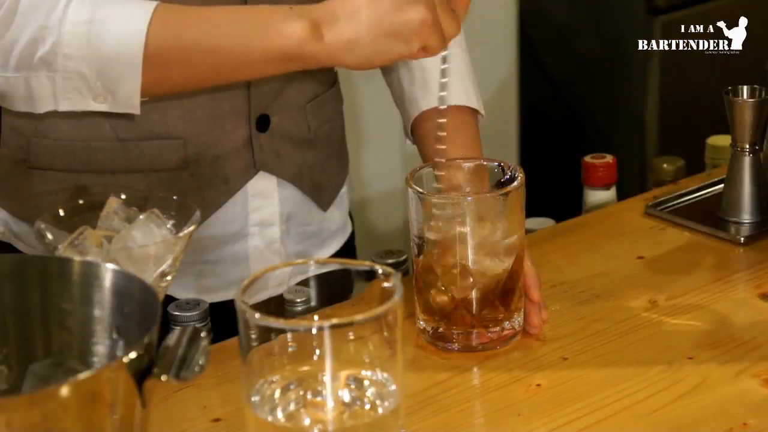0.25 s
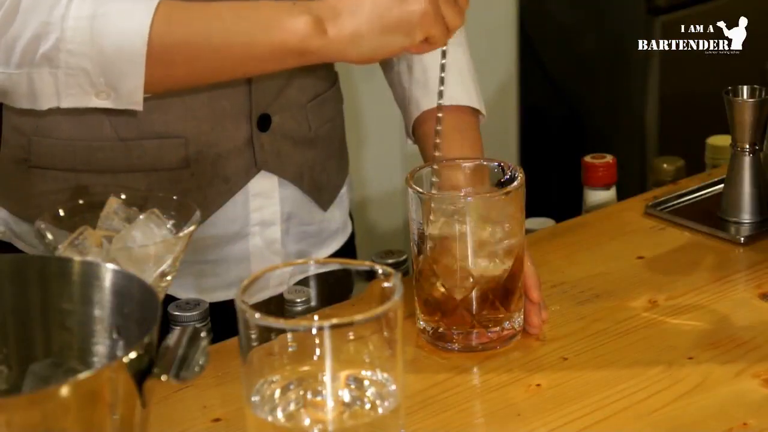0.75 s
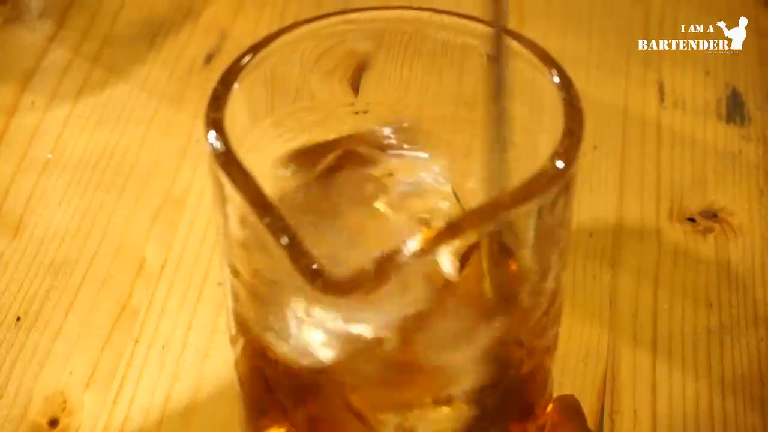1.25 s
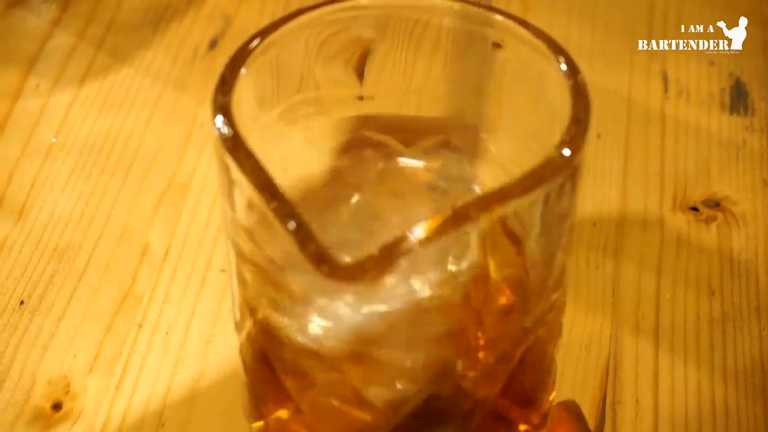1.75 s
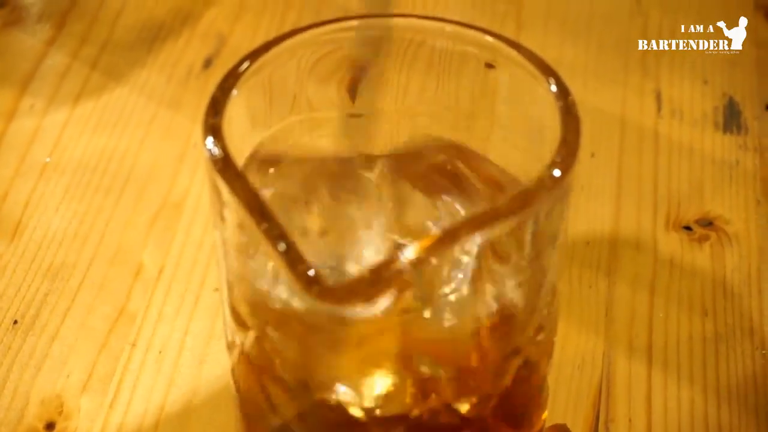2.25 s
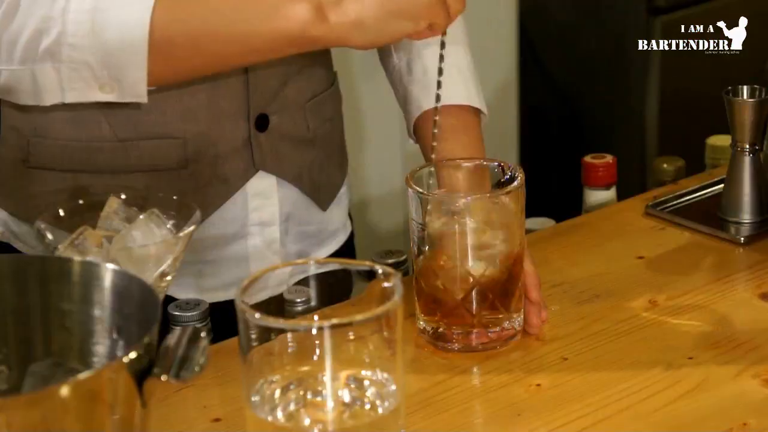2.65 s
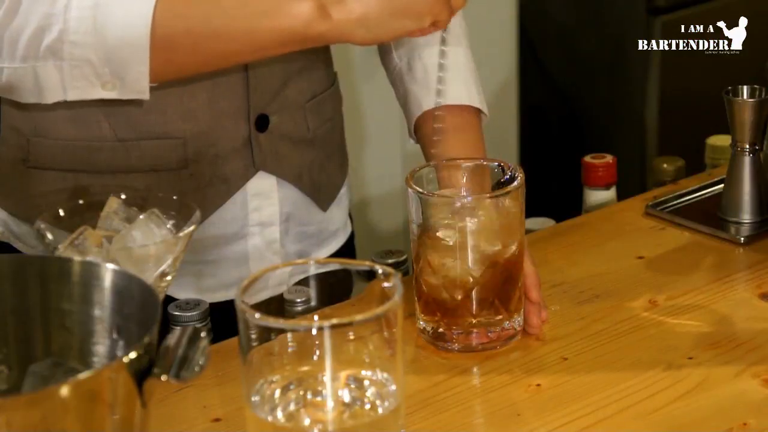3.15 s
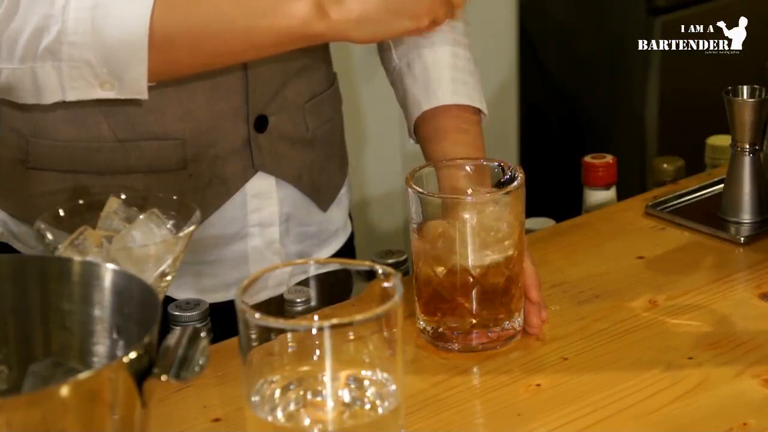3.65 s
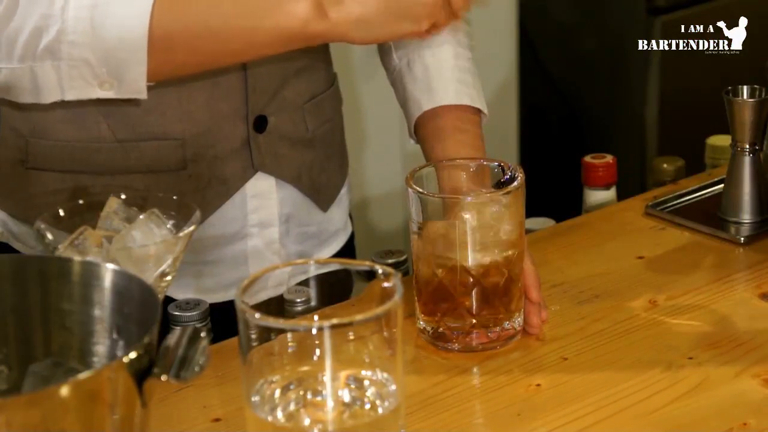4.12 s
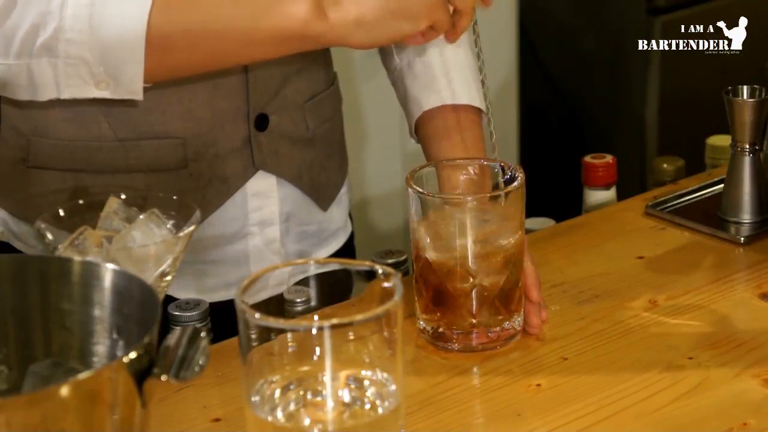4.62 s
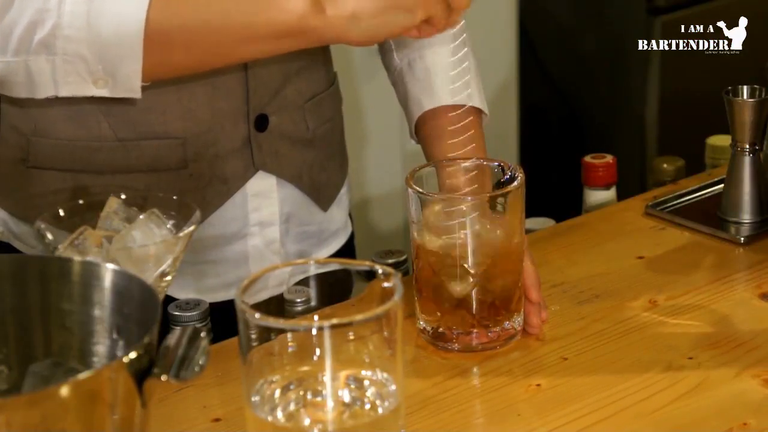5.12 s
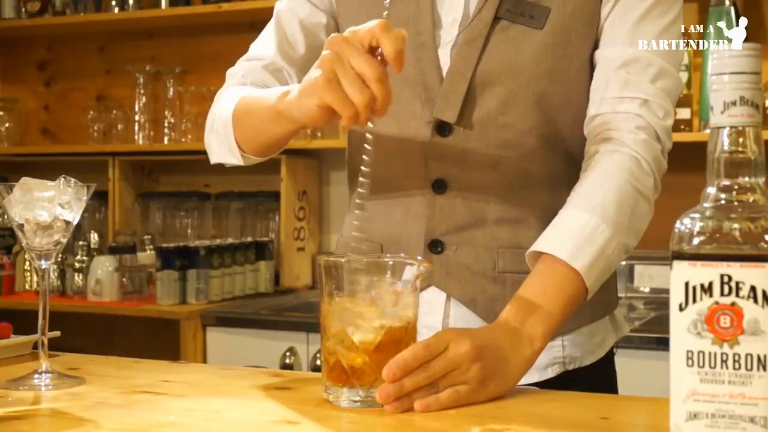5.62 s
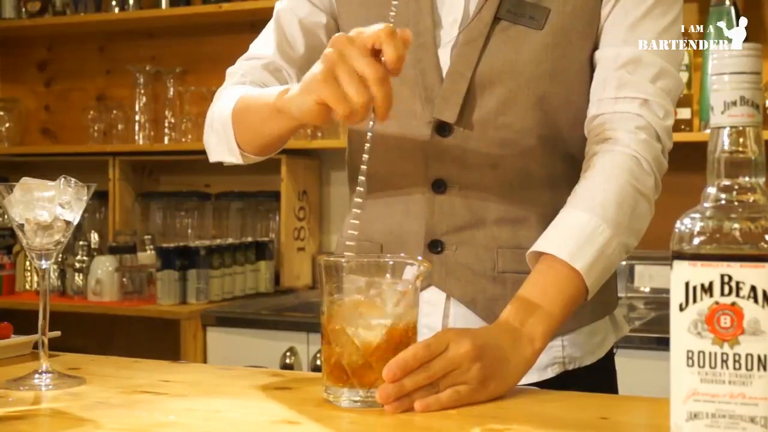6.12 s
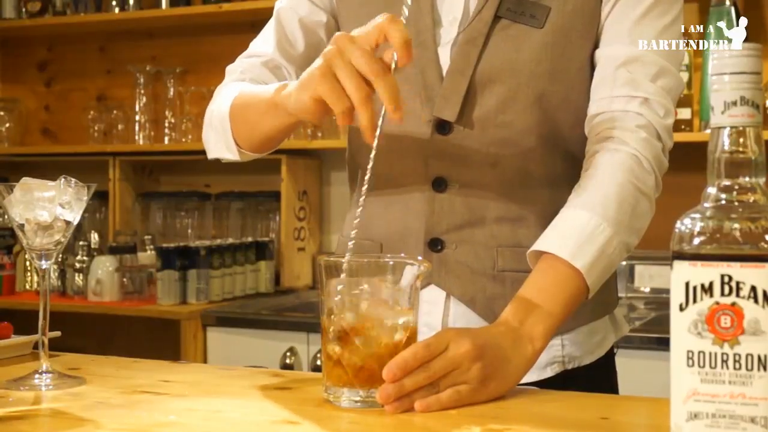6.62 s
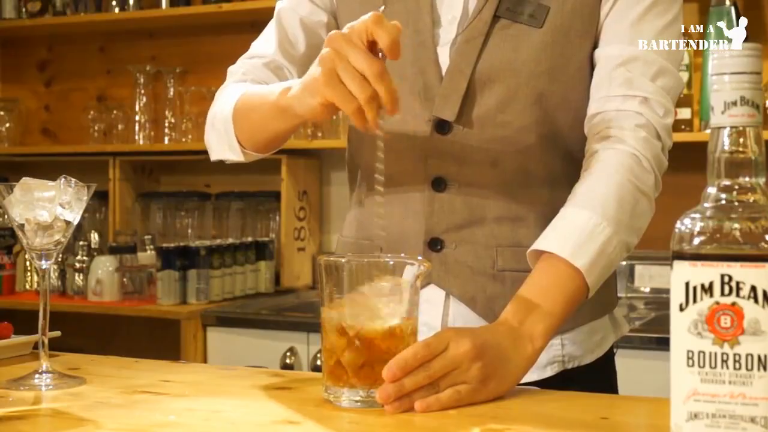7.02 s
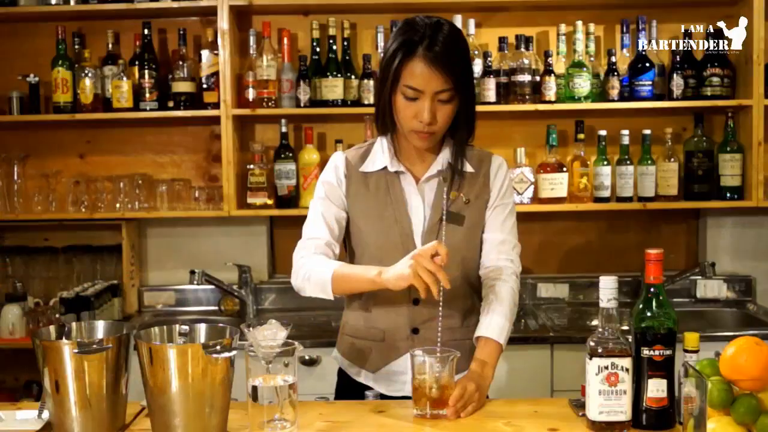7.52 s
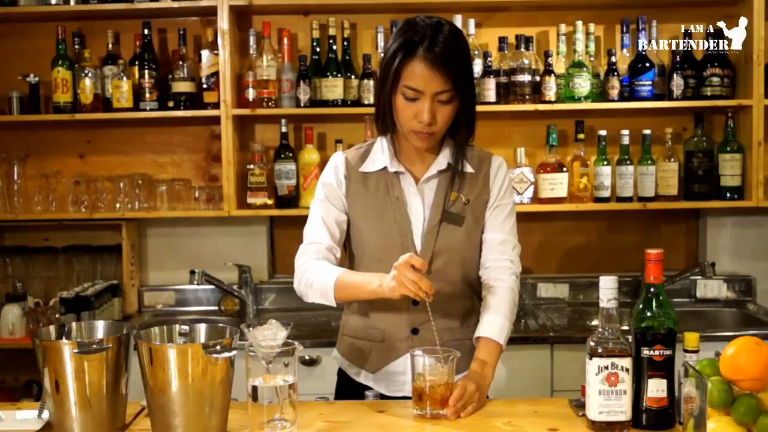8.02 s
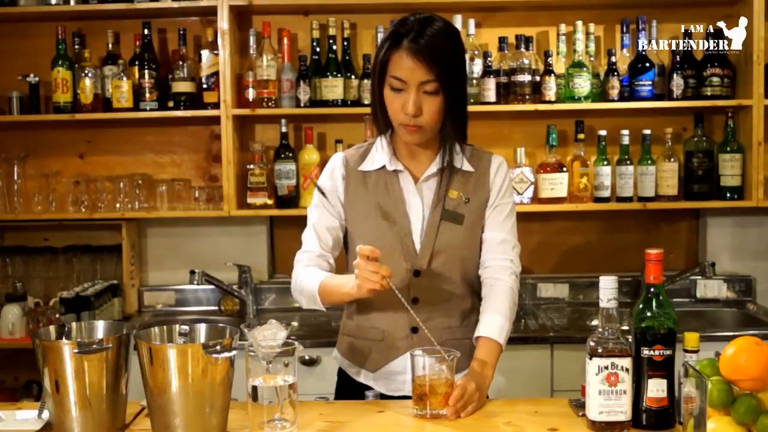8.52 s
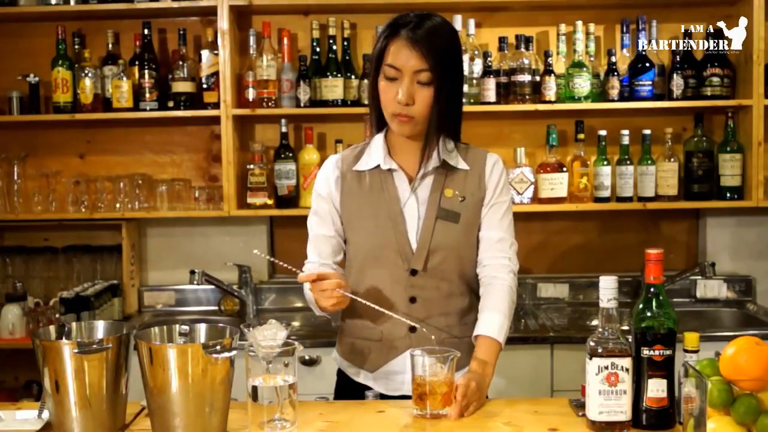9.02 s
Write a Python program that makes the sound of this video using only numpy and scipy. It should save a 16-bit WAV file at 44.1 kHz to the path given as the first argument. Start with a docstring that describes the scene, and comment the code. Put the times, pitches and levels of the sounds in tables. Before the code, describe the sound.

Wet ice is stirred rhythmically in a heavy glass, first softly, then close with sharp clinks, slowing to a final rattle and small spoon clinks.

```python
"""Stirring ice in a mixing glass

A long spoon stirs ice cubes and a drink in a thick glass, in a small bar with humming coolers, heard from
changing distances. Random contacts excite resonators: the packed ice churns and chatters along the wall, single
cubes clink and knock, and the glass rings along, flattened in pitch by the swirling drink. At the end the
ice collapses in a rattle and the spoon clinks on its way out."""
import sys
import numpy as np
from scipy import signal
from scipy.fft import rfft, irfft, next_fast_len
from scipy.io import wavfile
from scipy.ndimage import uniform_filter1d

SR = 44100
rng = np.random.default_rng(int(sys.argv[2]) if len(sys.argv) > 2 else 0)


def digitize_waveform(pressure):
    """Quantize a signal to 16-bit integers and store it at the path in sys.argv[1].

    Rows of a 2-D input are taken as channels; values are limited to [-1, 1].
    """
    field = np.atleast_2d(pressure).T
    bounded = np.clip(field, -1, 1)
    quanta = np.round(bounded * 32767).astype(np.int16)
    wavfile.write(sys.argv[1], SR, quanta)


N = 408530
TIME = np.arange(N) / SR  # s

# Levels in the tables are relative within their layer unless stated.
# hard contacts of cubes and spoon: start_s, body_db, crack_hz, crack_db, glass_ring_db
HARD_CONTACTS = [(1.243, -17, 2750, -20, -45), (1.453, -10.5, 2850, -19, -31), (1.469, -18, 3140, -37, -45),
                 (1.531, -15.5, 4800, -18.5, -24), (1.549, -19, 4300, -28, -39),
                 (1.577, -16, 3700, -21, -47), (1.694, -26, 3200, -31, -48), (1.73, -24, 3120, -20, -39),
                 (1.738, -13.5, 4670, -14.5, -23), (1.745, -10.5, 4530, -10, -30),
                 (1.805, -9, 6440, -17.5, -34), (1.823, -12.5, 3300, -15.5, -42),
                 (1.839, -20, 2900, -26, -42), (1.935, -20, 3370, -31, -29), (1.959, -16, 4240, -35, -39),
                 (1.999, -11.5, 3100, -20, -37), (2.165, -17.5, 6460, -36, -31),
                 (2.2, -16, 3900, -18.5, -40), (2.211, -19, 6460, -23.5, -45),
                 (2.391, -18.5, 2900, -23, -39), (2.436, -10, 6450, -29, -40),
                 (2.47, -16.5, 2960, -19.5, -39), (2.527, -16.5, 4800, -25, -33),
                 (2.587, -21, 5010, -35, -39), (2.859, -28, 2860, -32.5, -40), (3.583, -34, 2600, -31, -31),
                 (4.698, -26, 2560, -30, -28), (5.142, -25, 2520, -28, -32), (6.127, -32, 3630, -32.5, -46),
                 (6.389, -33, 2550, -27, -30), (6.666, -25, 2400, -24.5, -24.5),
                 (7.093, -33, 2720, -19, -18.5), (7.338, -19, 5100, -24.5, -25),
                 (7.506, -23.5, 4000, -30, -30), (7.664, -21, 3460, -21, -45),
                 (7.988, -19, 6680, -19.5, -23), (8.017, -23, 6650, -22, -38),
                 (8.033, -8.5, 4970, -21, -39), (8.34, -25.5, 3900, -35, -46), (8.511, -45, 1280, -26, -42),
                 (8.61, -45, 2700, -40, -30.5), (8.924, -37, 4650, -34.5, -42),
                 (9.017, -38, 3020, -26, -25.5), (9.039, -28, 3540, -29, -28)]
# modes of the filled glass, with the drink at rest for pitch and in full swirl for decay: mode_hz, level_db, t60_s
GLASS_MODES = [(2550, 0, 0.038), (2678, 5.5, 0.048), (2709, -1, 0.15), (2752, 3, 0.062), (3030, -29, .07),
               (3520, -11.5, 0.07), (4780, -18.5, 0.066), (5600, -18, 0.042), (6574, -6.5, 0.048)]
# ice scrapes along the glass wall: start_s, length_s, level_db
WALL_SCRAPES = [(0, 0.05, -39), (0.184, 0.035, -37), (0.933, 0.074, -36.5), (1.192, 0.072, -29.5),
                (1.385, 0.032, -33.5), (1.897, 0.13, -31), (2.081, 0.11, -32.5), (2.193, 0.085, -27.5),
                (2.863, 0.091, -36.5), (3.072, 0.095, -33.5), (3.312, 0.013, -28), (3.548, 0.033, -35),
                (3.781, 0.068, -32), (4.01, 0.024, -30), (4.23, 0.044, -30), (4.48, 0.019, -31),
                (4.691, 0.12, -32.5), (4.835, 0.027, -27.5), (4.956, 0.026, -36), (5.136, 0.024, -30.5),
                (5.233, 0.027, -29.5), (5.353, 0.023, -29), (5.556, 0.083, -33.5), (5.827, 0.037, -33.5),
                (6.105, 0.03, -31.5), (6.315, 0.016, -31.5), (6.55, 0.16, -34.5), (6.786, 0.081, -31),
                (6.966, 0.11, -35), (7.098, 0.065, -31.5), (7.238, 0.0085, -34.5), (7.326, 0.12, -32.5),
                (7.659, 0.074, -27.5), (7.896, 0.12, -28.5), (8.372, 0.081, -36.5), (8.614, 0.031, -38)]
# shoves of the spoon against cubes under the surface: start_s, level_db
SPOON_SHOVES = [(0.318, -31), (0.404, -34), (1.013, -26), (2.957, -26), (3.2, -28), (3.425, -25),
                (3.651, -20), (3.882, -21), (4.114, -26), (4.345, -25.5), (4.574, -29), (4.818, -22),
                (5.026, -25), (5.25, -32), (5.486, -22), (5.952, -29), (6.232, -24), (7.46, -26),
                (7.509, -22.5), (7.681, -33), (7.951, -26), (8.389, -27.5)]
# spectrum of the body of a struck cube: frequency_hz, level_db
BODY_SPECTRUM = [(1100, -21.5), (2100, -19), (2600, 0.5), (2950, -4), (3500, -13.5), (4100, -14)]
# spectrum of the edge of a struck cube: frequency_hz, level_db
EDGE_SPECTRUM = [(3300, 6.5), (4650, 3), (5900, -5), (6500, 0), (7500, -5), (8300, -47)]
# spectrum of a small chip of ice: frequency_hz, level_db
CHIP_SPECTRUM = [(3500, 3), (6500, 4.5), (8200, -4), (9800, 3.5), (15500, -17)]

SHOVE_ATTACK_S = 0.006
# shares of the wall's pitch at full swirl: steady lowering, and spread of the random wobble
SWIRL_FLATTENS, SWIRL_WOBBLES = 0.043, 0.011


def from_db(db):
    """Level to amplitude: 20 dB is a factor of ten."""
    return 10 ** (np.asarray(db) / 20)


def together_db(*gains):
    """Incoherent addition: the powers of unrelated sounds add."""
    return 10 * np.log10(sum(gain ** 2 for gain in gains) + 1e-18)


def rms_one(x):
    """Normalization to unit root-mean-square amplitude."""
    return x / np.sqrt(np.mean(x ** 2) + 1e-20)


def in_time(rows):
    """Linear interpolation: one curve per column, joined by straight lines."""
    s, *columns = np.transpose(rows)
    return [np.interp(TIME, s, c) for c in columns]


def held(rows):
    """Sample and hold: each value lasts until the next row, with short smoothed steps."""
    s, *columns = np.transpose(rows)
    row = np.searchsorted(s[1:], TIME)
    return [uniform_filter1d(c[row], size=800) for c in columns]


def at_hz(points, hz):
    """Interpolation of a spectrum on a logarithmic frequency axis."""
    known_hz, values = np.transpose(points)
    return np.interp(np.log(np.maximum(hz, 1)), np.log(known_hz), values)


def drift(rate):
    """Random modulation of unit rms: straight lines between random values, rate of them a second."""
    steps = rng.standard_normal(4096)
    return rms_one(np.interp(TIME * rate, np.arange(len(steps)), steps))


def cut(x, hz, kind, order=2):
    """Band limitation by a Butterworth filter."""
    return signal.sosfilt(signal.butter(order, hz, kind, fs=SR, output="sos"), x + 1e-18)


def resonate(x, hz, width_hz):
    """Damped resonance: a pole pair whose radius sets the bandwidth, with unit gain at the peak."""
    r = np.exp(-np.pi * width_hz / SR)
    zeros = np.array([1, 0, -1]) * (1 - r * r) / 2
    poles = [1, -2 * r * np.cos(2 * np.pi * hz / SR), r * r]
    return signal.lfilter(zeros, poles, x + 1e-18)


def ring(force, hz, t60, pitch):
    """Driven decaying oscillator: a unit click starts a sine of height 1 that follows the pitch factor."""
    cycles = np.cumsum(pitch) * (hz / SR)
    phase = (2 * np.pi * (cycles - np.floor(cycles))).astype(np.float32)
    cos, sin = np.cos(phase), np.sin(phase)
    decay_per_sample = from_db(-60 / (t60 * SR))
    # decaying memory of the force in both quadratures
    memory = signal.lfilter([1], [1, -decay_per_sample], [force * cos, force * sin])
    return memory[0] * sin - memory[1] * cos


def add(track, s, sound):
    """Linear superposition: mix a sound in at a time."""
    start = max(round(s * SR), 0)
    track[start:start + len(sound)] += sound[:N - start]


def strokes(rows, attack_s, release_s):
    """Movement envelopes (start_s, length_s, level_db): each rises, holds and decays; their powers add."""
    power, t = np.zeros(N), np.arange(SR * 3 // 4) / SR
    for s, length_s, db in rows:
        rise = np.minimum(t / attack_s, 1)
        fall = np.exp(-np.maximum(t - length_s, 0) / release_s)
        add(power, s, (from_db(db) * rise * fall) ** 2)
    return np.sqrt(power)


def contacts(per_s, spread_db):
    """Random impulse excitation: small collisions of uneven strength whose energy sums to 1 a second."""
    hit, force = rng.random(N) < per_s / SR, np.zeros(N)
    strength = np.minimum(rng.exponential(1, N)[hit], 3)
    force[hit] = from_db(spread_db * strength) * np.sign(rng.random(N)[hit] - .5)
    return rms_one(force) / np.sqrt(SR)


def cube(spectrum, t60, count=36):
    """Modal synthesis: a random crowd of short modes, with the energy of 10 ms at rms 1."""
    t = np.arange(SR // 25) / SR
    lowest_hz, highest_hz = spectrum[0][0], spectrum[-1][0]
    place = (np.arange(count) + rng.random(count)) / count
    hz = np.minimum(lowest_hz * (highest_hz / lowest_hz) ** place, SR / 2)
    sizes = from_db(at_hz(spectrum, hz)) * rng.standard_normal(count)
    mode_t60 = t60 * from_db(rng.normal(0, 6.5, (count, 1)))  # scattered about t60
    decay = from_db(-60 * t / mode_t60)
    sound = sizes @ (decay * np.sin(2 * np.pi * hz[:, None] * t))
    return sound * np.sqrt(SR / 100 / np.sum(sound ** 2))


def background():
    """Shaped noise of partly correlated ears for ventilation air, and slightly wavering sines for the coolers."""
    # spectrum of the air: frequency_hz, density_db
    air_spectrum = [(25, -32), (60, -11), (100, -10.5), (150, 4), (280, -0.5), (400, -11.5), (550, -2),
                    (1000, -7.5), (4000, -21.5), (8000, -26), (16000, -29.5)]
    # left-right likeness of the air: frequency_hz, correlation
    ear_likeness = [(150, 1), (450, 0.36), (12000, 0.035)]
    # cooler hum: frequency_hz, mean_rms_db
    hum_tones = [(119.8, -42.5), (172.3, -49), (239.6, -54.5)]
    air_rms_db = -39
    size = next_fast_len(N, True)
    hz = np.arange(size // 2 + 1) * SR / size
    mid, side = rfft(rng.standard_normal((2, size))) * from_db(at_hz(air_spectrum, hz))
    alike = np.clip(at_hz(ear_likeness, hz), 0, 1)
    ears = np.sqrt(1 + alike) * mid + np.sqrt(1 - alike) * side * [[1], [-1]]
    air = irfft(ears, size)[:, :N]
    hum = 0
    for f, db in hum_tones:
        level = from_db(db + drift(12)) * np.sqrt(2)
        hum = hum + level * np.sin(2 * np.pi * f * TIME + 0.22 * drift(4.7))
    return from_db(air_rms_db) * rms_one(air) + hum


def room(x, room_db):
    """Diffuse reverberation: direct sound plus a noise tail, different in each ear, longest in the upper middle."""
    # reverberation time of the room: frequency_hz, t60_s
    reverberation = [(200, 0.19), (3000, 0.27), (15000, 0.19)]
    t = np.arange(SR // 2) / SR
    edges = np.geomspace(90, 16000, 9)  # band limits, Hz
    white, tail = rng.standard_normal((3, len(t))), 0
    white = white[:2] + 0.22 * white[2]  # a small part is common to both ears
    for low, high in zip(edges, edges[1:]):
        t60 = at_hz(reverberation, np.sqrt(low * high))
        tail = tail + cut(white, [low, high], "band") * from_db(-60 * t / t60)
    tail = tail * np.clip((t - .003) / 0.003, 0, 1)  # sets in from 3 to 6 ms
    tail = tail / np.sqrt(np.sum(tail ** 2) / 2) * from_db(-1.5)
    sent = (x * from_db(room_db))[None]
    return x + signal.fftconvolve(sent, tail, axes=1)[:, :N]


def slosh(slosh_db):
    """Low resonances under irregular forcing: soft lumpy pushes of the drink."""
    # resonances of the sloshing drink: frequency_hz, width_hz, level_db
    drink_resonances = [(387, 47, -3), (502, 27, -5.5), (657, 100, -10), (1057, 127, -5.5)]
    force = contacts(per_s=300, spread_db=8.0)
    pushes = sum(from_db(db) * resonate(force, hz, width) for hz, width, db in drink_resonances)
    return from_db(slosh_db) * rms_one(cut(pushes, [230, 1400], "band"))


def crackle(rattle_db):
    """Brittle fracture: now and then a small chip breaks off a cube's edge with a crisp tick."""
    crackles_per_s, crackle_db = 60, -16  # level re the rattle
    force = from_db(rattle_db + crackle_db) * rms_one(contacts(crackles_per_s, spread_db=5.5))
    tick = 0.96 * cube(CHIP_SPECTRUM, t60=0.015) + cube(EDGE_SPECTRUM, t60=0.01)
    return signal.oaconvolve(force, tick / np.sqrt(np.sum(tick ** 2)))[:N]


def tumble(collapse):
    """Parallel resonances struck at random: falling cubes batter each other and the glass."""
    # what the tumbling cubes ring with: frequency_hz, width_hz, level_db
    tumble_resonances = [(1293, 43, 6.5), (2016, 48, 13), (2345, 50, 10), (2660, 50, 0), (3300, 400, -3),
                         (6680, 160, -15)]
    tumbles_per_s, collapse_db = 350, -24
    force, rings = contacts(tumbles_per_s, spread_db=1.5), 0
    for k, (hz, width, db) in enumerate(tumble_resonances):
        rings = rings + (-1) ** k * from_db(db) * resonate(force, hz, width)  # alternating polarity
    return from_db(collapse_db) * collapse * rms_one(cut(rings, 7000, "low", order=4))


def singing_cube(chatter_db):
    """Gliding resonance: with each scrape a cube rings high and sinks in pitch as it is pushed under."""
    afloat_hz, sunk_hz, sinks_s = 2850, 2209, 0.062  # sinks_s is the time constant of the glide
    sing_t60_s, sing_db = 0.02, -10.5  # level re the wall chatter
    size_spread = 0.025  # share of the pitch
    starts = np.array(WALL_SCRAPES)[:, 0]
    since_s = np.maximum(TIME - starts[np.searchsorted(starts[1:], TIME)], 0)
    hz = sunk_hz + (afloat_hz - sunk_hz) * np.exp(-since_s / sinks_s)
    hz = hz * (1 + size_spread * drift(8))
    song = ring(contacts(per_s=700, spread_db=1.0), afloat_hz, sing_t60_s, hz / afloat_hz)
    return from_db(chatter_db + sing_db) * rms_one(cut(song, [1700, 3800], "band"))


def rattle(rattle_db, chatter_db, count=5):
    """Impulses into modal bodies: cube corners tick together and grate along the wall, each with its own modes."""
    rattles_per_s = 340
    force = contacts(rattles_per_s, spread_db=7.0)
    dealt = rng.integers(0, count, N)  # which cube takes each contact
    ticks = 0
    for k in range(count):
        tick = cube(BODY_SPECTRUM, t60=0.004) + 0.3 * cube(EDGE_SPECTRUM, t60=0.012)
        ticks = ticks + signal.oaconvolve(force * (dealt == k), tick)[:N]
    return np.hypot(from_db(rattle_db), from_db(chatter_db - 15.0)) * rms_one(ticks)


def struck_ice():
    """Impact excitation: a firm hit snaps, a weak one skids for longer, both rebound; chips give thin ticks."""
    # thin ticks of chipping ice: start_s, level_db
    chip_ticks = [(.352, -43), (0.531, -43.5), (1.531, -39), (1.96, -32), (2.332, -35.5), (5.349, -37.5),
                  (6.22, -37), (6.29, -42.5), (6.642, -38.5), (7.332, -32), (7.987, -28.5)]
    rebound_db, rebound_s, rebounds_per_s = -15, 0.015, 300  # a struck cube chatters on for a moment
    crack_width_hz, splinter_db = 150, -8  # a crack is one short note with a spray of others around it
    out, t = np.zeros(N), np.arange(SR // 12) / SR
    for s, body_db, crack_hz, crack_db, _ in HARD_CONTACTS:
        skid_s = np.interp(max(body_db, crack_db), [-33, -23], [.004, .0013])
        rebounds = (rng.random(len(t)) < rebounds_per_s / SR) * np.exp(-t / rebound_s)
        touch = np.exp(-t / skid_s) + from_db(rebound_db) * np.sqrt(skid_s * SR / 2) * rebounds
        skids = rng.standard_normal((2, len(t))) * touch
        body, splinters = (
            rms_one(sum(signal.fftconvolve(cube(spectrum, t60=0.01), skid)[:len(t)] for skid in skids))
            for spectrum in (BODY_SPECTRUM, EDGE_SPECTRUM))
        note = rms_one(resonate(skids[0], crack_hz, crack_width_hz))
        crack = note + from_db(splinter_db) * splinters
        hit = from_db(body_db) * body + from_db(crack_db) * crack
        add(out, s, from_db(-15.0) * hit)
    out = cut(cut(out, 570, "high"), 7500, "low", order=4)
    for s, db in chip_ticks:
        add(out, s, from_db(db) * cube(CHIP_SPECTRUM, t60=0.037, count=200))
    return out


def struck_glass(swirl):
    """Free modal vibration after each hard contact: the stiller the drink, the higher and longer the ring."""
    still_ring_gain = 1.3  # extra share of t60 in a drink at rest
    ring_attack_s = 0.0015
    ripple_share, ripples_per_s = 0.012, 90
    ripples = 1 + ripple_share * drift(ripples_per_s)  # ripples roughen the pitch
    out, t = np.zeros(N), np.arange(SR // 3) / SR
    hz, mode_db, t60 = np.transpose(GLASS_MODES)[:, :, None]
    for s, *_, ring_db in HARD_CONTACTS:
        spin = swirl[round(s * SR)]
        warped_s = np.cumsum(np.roll(ripples, -round(s * SR))[:len(t)]) / SR
        levels_db = ring_db - 3.5 + mode_db + rng.normal(0, 2.2, hz.shape)
        sizes = from_db(levels_db) * rng.choice([-1, 1], hz.shape)
        ring_t60 = t60 * (1 + still_ring_gain * np.clip(1 - spin, 0, 1))
        decay = np.exp(-np.log(1000) * t / ring_t60)
        phase = (2 * np.pi * hz * (1 - spin * SWIRL_FLATTENS) * warped_s).astype(np.float32)
        rise = np.minimum(t / ring_attack_s, 1)
        add(out, s, rise * np.sum(sizes * decay * np.sin(phase), axis=0))
    return out


def glass(chatter_db, swirl):
    """Mass loading and damping: sliding ice rings and damps the wall; the climbing drink lowers its pitch unsteadily."""
    slides_per_s = 800
    sliding_ring_share = 0.6  # share of t60 left under sliding ice
    sliding = from_db(chatter_db + 20.5) * contacts(slides_per_s, spread_db=5.0)
    pitch = 1 - swirl * (SWIRL_FLATTENS + SWIRL_WOBBLES * drift(12))
    touched, out = np.flatnonzero(sliding), np.zeros(N)
    for hz, db, t60 in GLASS_MODES:
        force = np.zeros(N)
        softness = 1 / np.sqrt(1 + (hz / 3700) ** 4)  # wet, glancing touches miss the high modes
        force[touched] = sliding[touched] * softness * rng.standard_normal(len(touched))
        out += from_db(db) * ring(force, hz, t60 * sliding_ring_share, pitch)
    return out


def churn(churn_db, hollow_db, swirl):
    """Coupled resonance: jostling wet cubes and swishing shoves both sound the hollow note of the glass."""
    # resonances of wet ice, drink and glass on the counter: frequency_hz, width_hz, level_db
    churn_resonances = [(154, 41, 3), (303.3, 46, 3), (539, 37, 1.5), (730, 61, -5.5), (1124, 170, -1.5),
                        (1820, 143, -5.5), (2063, 78, 2)]
    jostles_per_s, swish_grains_per_s = 2500, 4000
    shove_hold_s, shove_release_s = 0.0075, 0.024
    swish_still_share = 0.085  # in a resting drink a shove is mostly a hollow knock
    force = from_db(churn_db + 10.5) * rms_one(contacts(jostles_per_s, spread_db=2.0))
    body = 0
    for k, (hz, width, db) in enumerate(churn_resonances):
        body = body + (-1) ** k * from_db(db) * resonate(force, hz, width)  # alternating polarity
    shoves = [(s, shove_hold_s, db) for s, db in SPOON_SHOVES]
    push = from_db(8.5) * strokes(shoves, SHOVE_ATTACK_S, shove_release_s)
    swish = push * rms_one(contacts(swish_grains_per_s, spread_db=-2))
    # the lowest mode moves the most drink, so its pitch wobbles most with the swirl
    hollow_pitch = 1 - swirl * (0.037 + 0.04 * drift(45))
    hollow = from_db(hollow_db - 31.5) * ring(force + 1.06 * swish, 1293, 0.04, hollow_pitch)
    wet = swish_still_share + (1 - swish_still_share) * swirl
    liquid = wet * cut(swish, [1100, 2150], "band", order=3)
    return cut(body, 6900, "low") + cut(hollow, 850, "high") + liquid


def stirring(swirl):
    """Power summation of effort, scrapes and the heave after each shove: levels of churn and wall chatter."""
    # effort of the stirring hand, as the steady churn of wet ice: time_s, level_db
    hand_effort = [(0, -32.5), (.17, -41.5), (.42, -31.5), (.72, -40.5), (1.2, -34.5), (1.4, -37),
                   (1.8, -28.5), (2.1, -38.5), (2.56, -32), (2.63, -38.5), (3.1, -37), (4.6, -36),
                   (5.45, -31.5), (5.8, -39.5), (6.25, -33), (7.15, -44.5), (8.45, -45.5), (8.9, -55.5)]
    # each turn of the spoon, up to about four a second, drags ice along the wall and then shoves it round
    scrape_attack_s, scrape_release_s = 0.0025, 0.034
    scrape_churn_db = -5  # churn stirred up by a scrape
    heave_hold_s, heave_release_s = 0.03, 0.033  # the pack of ice goes on moving after a shove
    shove_churn_db, shove_wall_db = -5.5, -9
    idle_wall_db = -4  # light touches on the wall, re the effort
    effort = from_db(in_time(hand_effort)[0])
    scrape = strokes(WALL_SCRAPES, scrape_attack_s, scrape_release_s)
    heaves = [(s, heave_hold_s, db) for s, db in SPOON_SHOVES]
    heave = swirl * strokes(heaves, SHOVE_ATTACK_S, heave_release_s)
    churn_db = together_db(effort, scrape * from_db(scrape_churn_db), heave * from_db(shove_churn_db))
    chatter_db = together_db(scrape, effort * from_db(idle_wall_db), heave * from_db(shove_wall_db))
    return churn_db, chatter_db


def scene():
    """Superposition of drink, ice, wall and background: the glass stands a little right, its wall further."""
    # the drink spins steadily, then slows with the hand: time_s, swirl (0 to 1)
    spin_curve = [(0, 0.85), (5.9, 1), (7.1, 0.22), (9.25, 0.12)]
    # listening positions: from_s, room_db, fine_rattle_db and slosh_db (re churn), right_offset_db (each ear)
    listening_positions = [(0, -3.5, -24, -18, 0.5), (1.1, -7.5, -4.5, -1, 1.05), (2.6, -4, -24, -21, 0.5),
                           (5.45, -3.5, -14, -20, 0.5), (7.42, -2.5, -1.5, -15.5, 0.46)]
    hollow_spinning_db, hollow_still_db = -7.5, -1  # the hollow note clears as the drink comes to rest
    # the pack of ice collapses as the spoon is drawn out
    collapse_s, collapse_attack_s, collapse_length_s, collapse_release_s = 7.965, 0.03, 0.09, 0.07
    collapse_churn_db, collapse_rattle_db = -26.5, -28.5

    swirl, = in_time(spin_curve)
    room_db, rattle_db, slosh_db, offset_db = held(listening_positions)
    stir_db, chatter_db = stirring(swirl)
    collapse = strokes([(collapse_s, collapse_length_s, 0)], collapse_attack_s, collapse_release_s)
    churn_db = together_db(from_db(stir_db), collapse * from_db(collapse_churn_db))
    fine_db = stir_db + rattle_db
    ticking_db = together_db(from_db(fine_db), collapse * from_db(collapse_rattle_db))
    hollow_db = swirl * hollow_spinning_db + (1 - swirl) * hollow_still_db

    drink = churn(churn_db, hollow_db, swirl) + slosh(churn_db + slosh_db)
    ice = struck_ice() + singing_cube(chatter_db) + rattle(ticking_db, chatter_db)
    ice = ice + crackle(fine_db) + tumble(collapse)
    ringing = glass(chatter_db, swirl) + struck_glass(swirl)

    ear_db = offset_db * [[-1], [1]]  # left, right
    contents = room(drink + ice, room_db + 3.5) * from_db(ear_db - 1.4)
    wall = room(ringing, room_db + 2.5) * from_db(1.5 * ear_db - 1.5)
    return contents + wall + background()


def record(dry):
    """Soft saturation and band limitation: peaks are rounded, the top is cut."""
    cutoff_hz = 15900
    rounded = 1.2 * np.tanh(dry / 1.2)
    return signal.sosfilt(signal.ellip(12, .1, 80, cutoff_hz, fs=SR, output="sos"), rounded)


dry = scene()
out = record(dry)
digitize_waveform(out)
```